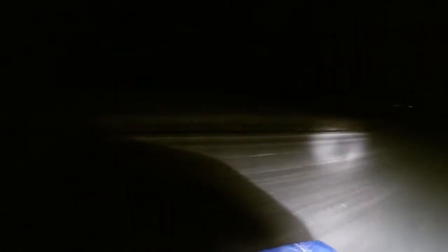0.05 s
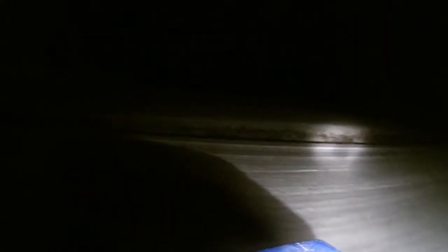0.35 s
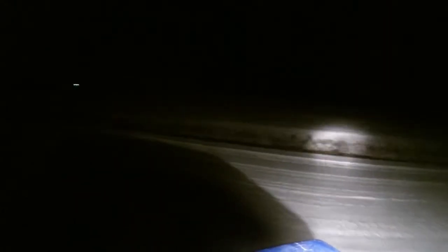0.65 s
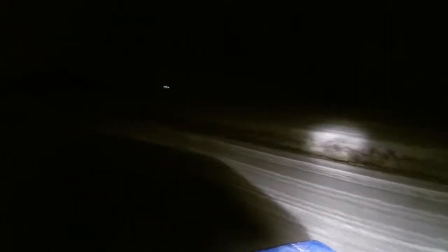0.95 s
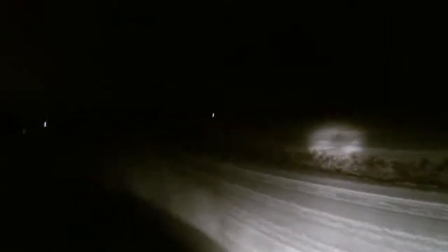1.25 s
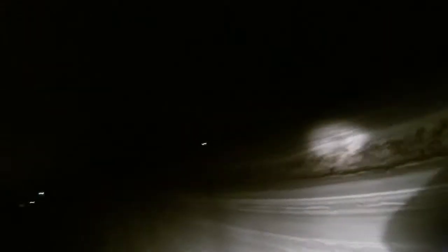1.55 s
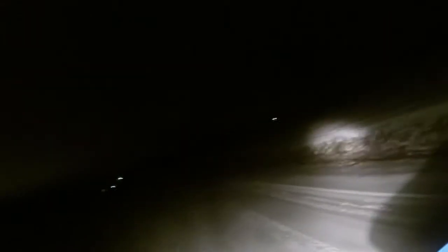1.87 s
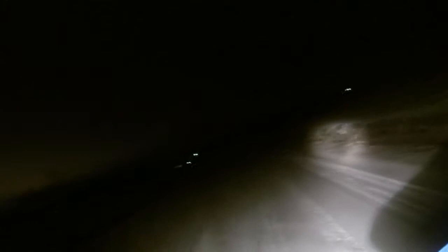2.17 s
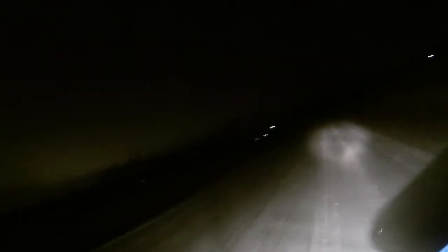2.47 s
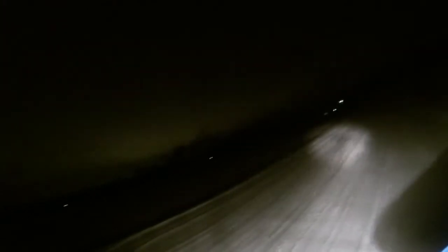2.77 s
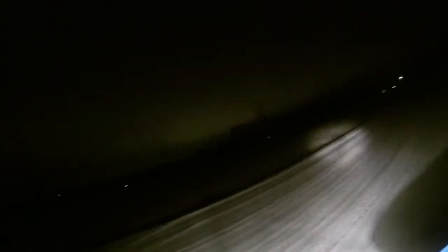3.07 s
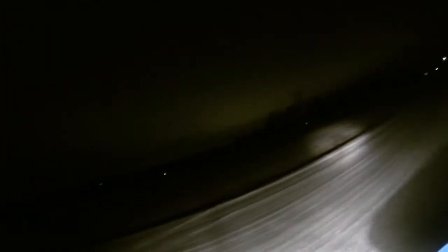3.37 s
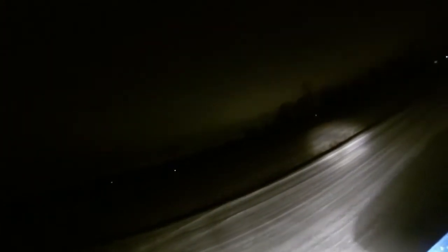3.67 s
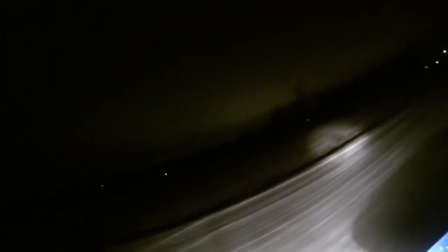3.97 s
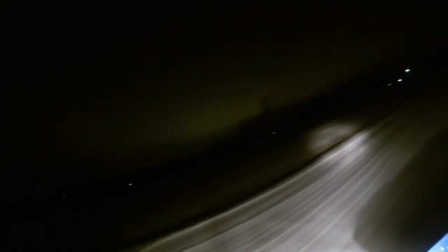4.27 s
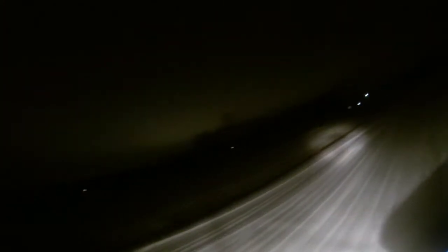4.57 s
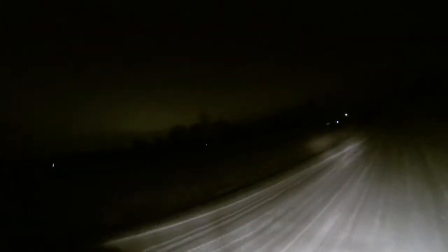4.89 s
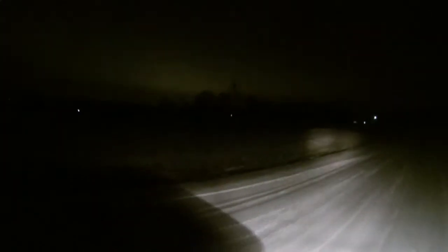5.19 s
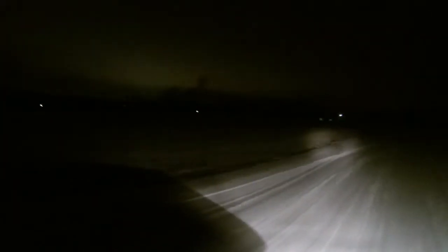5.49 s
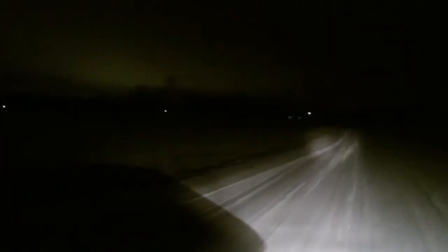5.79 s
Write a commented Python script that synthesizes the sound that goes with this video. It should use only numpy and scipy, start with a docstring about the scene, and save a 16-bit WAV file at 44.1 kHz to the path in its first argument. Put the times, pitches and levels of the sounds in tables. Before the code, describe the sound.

Close to the microphone, a two-stroke quad engine sputters at low speed outdoors. The rider blips the throttle about six times, each buzzing rise sinking back into a growl, the later ones coming closer together. The revs then stay fairly high, wavering with quick small pushes. A mechanical whirr and low shudder run underneath, and the bodywork clicks and rattles toward the end.

```python
"""On a dark track, a small two-stroke quad is heard from the rider's seat.
It putters unevenly, is blipped up and down six times, then held at high revs with short dabs of throttle.
Each turn of the crank fires once, so the sound is built on orders: multiples of the firing rate.
The firings excite fixed resonances: the exhaust booms, the cylinder rasps and the crankcase whirrs,
while the frame shudders and loose parts knock in time."""
import sys
import numpy as np
from scipy import signal
from scipy.fft import rfft, irfft
from scipy.io import wavfile

SR = 44100
rng = np.random.default_rng(int(sys.argv[2]) if len(sys.argv) > 2 else 0)


def transcribe(u):
    """Save the signal u as a 16-bit wav file named by the first command-line argument.

    u: samples, shape (n,) or (channels, n), limited to [-1, 1]; the rate is SR.
    q: integer samples, one column per channel.
    """
    v = np.clip(np.atleast_2d(u).T, -1, 1)
    q = np.round(v * 32767).astype(np.int16)
    wavfile.write(sys.argv[1], SR, q)


N = 266364
TIME = np.arange(N) / SR
MID_HZ = 104.2  # firing rate in the middle of the rev range

# At low revs the engine four-strokes: two turns in five fire hard.
# Each entry: the strength of one firing against the mean.
FIRING_PATTERN = [2.5, -0.27, 1.5, -1.7, -1]
# Slow drift of the mechanical noise. Each row: time in seconds, rasp in dB, whirr in dB.
MACHINE_DRIFT = [(0, 4, -15), (0.901, 3, -5), (1.08, -3.5, -9), (1.16, 4.5, 3), (1.27, -4.5, -6),
                 (1.42, 3, 2), (1.75, 3.5, 2.5), (1.9, 1, -4.5), (2.04, 4.5, 0.5), (2.16, -2, -1.5),
                 (2.24, 2, -1), (2.35, 0.5, 1), (2.65, 1, 2.5), (3.2, -1, 2), (3.88, -1.5, 0.5),
                 (4.0, 2, -3), (4.1, -1, -3), (4.3, 0, 0), (5.0, 2, 1), (5.32, -0.5, -6), (5.55, 6.5, 0.5),
                 (6.04, 2.5, 0.5)]
# A flare as the engine falls back from its highest revs.
# In order: time and half length in seconds, lift of the snarl and of the rasp in dB.
OVERRUN_FLARE = (1.41, 0.042, 13, 5.7)


def exhaust(turns, speed, throttle, silencer_db=-26, trim_db=-0.35, lag_s=0.0045):
    """Forced resonance: each low order swells a moment after it crosses a resonance of the pipe."""
    # Each row: firing rate in Hz, then the levels of orders 1 to 4 in dB.
    pipe_response = [(68, -23, -24.5, -37, -25), (77.2, -26.5, -26, -25, -23.5), (85, -28, -27.5, -21, -19),
                     (91.6, -18, -29.5, -25.5, -22.5), (97.3, -16.5, -29.5, -21.5, -28.5),
                     (104.1, -19.5, -27, -20.5, -26.5), (112, -21.5, -24, -23.5, -27),
                     (118.1, -25.5, -15, -29.5, -24.9), (129.3, -31, -13, -27.5, -25),
                     (140.3, -34.2, -23, -22, -24), (149, -35, -16, -23, -36)]
    # Each entry: the lift at full throttle in dB, for orders 1 to 4.
    throttle_lifts = [1.5, 3, -1, -2]
    # Each row: time in seconds, then the drift of orders 1 to 4 in dB.
    order_drift = [(0, -1.5, 5.5, 0, 0.82), (.9, -1.5, 5.5, -2, -2), (1.1, 1, 0, -1.2, -2.3),
                   (2.15, 0, 0.5, 0.21, 1.7), (4.5, 1.5, 0.5, 0.084, 0.22), (4.719, -6.5, -1, -1.02, 0),
                   (5.25, -3.5, 0, -1, -0.29), (5.6, 0.5, 0.5, 0.03, 0), (6.04, 0, 0, -0.45, 0)]
    # The silencer colours the upper orders. Each row: frequency in Hz, relative gain in dB.
    silencer = [(250, -30), (345, 12), (400, -11.5), (480, 6), (530, 1), (600, -10), (700, -31),
                (800, -35.5), (1500, -54.5)]
    airbox_hz, airbox_width_hz, airbox_db = 332, 36, 10.5  # honks when the throttle is open
    rates, *responses = np.transpose(pipe_response)
    lagged = np.interp(TIME - lag_s, TIME, speed)
    out = gain_of(silencer_db) * through(upper_orders(turns), silencer)
    per_order = zip(responses, throttle_lifts, follow(order_drift))
    for order, (response, lift_db, drift_db) in enumerate(per_order, 1):
        honk_db = airbox_db * bell(order * lagged, airbox_hz, airbox_width_hz)
        db = np.interp(lagged, rates, response) + (lift_db + honk_db) * throttle
        db += drift_db + 2 * wander(16) + trim_db
        out += np.sqrt(2) * gain_of(db) * np.cos(2 * np.pi * (order * turns + rng.random()))
    return out


def sputter(turns, speed, throttle, uneven_db=-4, pattern_db=-6.5, gas_db=-7):
    """Amplitude modulation: unequal firings put sidebands between the orders, and the pipe growls."""
    # Resonances of the pipe. Each row: frequency in Hz, relative gain in dB.
    pipe = [(60, -27), (110, -5.5), (150, -22), (195, -20), (245, -5), (325, -2.5), (400, -8), (490, -6.5),
            (600, -19), (790, -27.5), (1000, -31), (3000, -83)]
    # In order: base level in dB, dB per octave of revs, dB added at full throttle.
    law = (-25, -11, 3.5)
    db = level(law, speed, throttle, waver_db=0.1)
    slow = low_revs(speed, below_hz=90, span_hz=12)
    uneven = evened(firings(turns, rng.uniform(-0.76, 1, 1024))) * (1 - 0.07 * slow)
    pattern = evened(firings(turns, FIRING_PATTERN)) * slow
    gas = evened(puffs(turns, decay=0.2, floor=0.26))
    drive = gain_of(uneven_db) * uneven + gain_of(pattern_db) * pattern + gain_of(gas_db) * gas
    return gain_of(db) * through(reflected(drive, delays_s=(.0019, .0031, .0047)), pipe)


def snarl(turns, speed, throttle, gas_db=-7):
    """Source and filter: high orders and rushing gas take a bright edge from the tailpipe."""
    # Resonances of the tailpipe. Each row: frequency in Hz, relative gain in dB.
    tailpipe = [(480, -19), (620, 3), (700, 1.5), (780, -7.5), (850, 4.5), (930, -1.5), (1020, -6.5),
                (1160, -2), (1400, -4), (2200, -21), (4000, -49)]
    # In order: base level in dB, dB per octave of revs, dB added at full throttle.
    law = (-38, -1, 7.1)
    # Each row: time in seconds, drift of the level in dB.
    drift = [(0, -3), (.45, -1), (.7, 1), (1.15, -2.5), (1.8, 3), (2.4, -1.5), (2.75, 3), (3.25, 4),
             (3.75, 2.5), (4.15, 0), (4.45, 2.5), (4.7, -1.5), (5.35, 0), (6.04, -0.5)]
    flare_s, half_s, flare_db, _ = OVERRUN_FLARE
    db = level(law, speed, throttle, waver_db=1.34) + follow(drift)[0]
    db += flare_db * swell(flare_s, half_s)
    gas = through(puffs(turns, decay=0.088, floor=0.78), tailpipe)
    return gain_of(db) * (through(upper_orders(turns), tailpipe) + gain_of(gas_db) * gas)


def cylinder(turns, speed, throttle, gas_db=-1, slap_db=-6):
    """Broadband excitation: rushing gas and piston slap ring the cylinder, which rasps."""
    # Resonances of the cylinder. Each row: frequency in Hz, relative gain in dB.
    walls = [(500, -37.5), (1020, -17), (1300, 2), (1550, 2.5), (1800, -7.5), (2150, -15.5), (2440, -23),
             (2680, -17.5), (3300, -30.5), (3900, -28.5), (4500, -38.5), (5400, -33.5), (7000, -58.5),
             (15000, -64)]
    # In order: base level in dB, dB per octave of revs, dB added at full throttle.
    law = (-30, -1.4, 6.26)
    drift_db, _ = follow(MACHINE_DRIFT)
    flare_s, half_s, _, flare_db = OVERRUN_FLARE
    db = level(law, speed, throttle, waver_db=1.46) + drift_db + flare_db * swell(flare_s, half_s)
    gas = through(puffs(turns, decay=1, floor=1) * gain_of(1.3 * wander(42)), walls)
    impacts = firings(turns, 1 + 0.72 * rng.uniform(-1.3, 1, 1024))
    slap = through(reflected(impacts, delays_s=(.0007, .0013)), walls)
    return gain_of(db) * (gain_of(gas_db) * gas + gain_of(slap_db) * slap)


def crankcase(turns, speed, throttle, grind_db=-5, ring_db=-7, case_hz=1920, width_hz=150):
    """Friction and resonance: bearings grind, and each gear whine flares as it crosses the case's mode."""
    # Whirr of the case. Each row: frequency in Hz, relative gain in dB.
    whirr = [(1000, -16.5), (1600, -0.5), (1930, 5), (2120, -1), (2400, -13), (2750, -16.5), (3250, -26),
             (3650, -9.5), (3950, -10.5), (4250, -28), (5700, -27.5), (7300, -46), (8400, -49.5),
             (15000, -63)]
    # Each row: a gear whine's multiple of the crank speed, its relative level in dB.
    gears = [(14.9, -8), (21.8, -4)]
    # In order: base level in dB, dB per octave of revs, dB added at full throttle.
    law = (-29, -3, 0.73)
    _, drift_db = follow(MACHINE_DRIFT)
    db = level(law, speed, throttle, waver_db=0.44) + drift_db
    grind = through(puffs(turns, decay=1, floor=1), whirr)
    out = gain_of(grind_db) * grind + gain_of(ring_db) * castings(turns)
    for order, gear_db in gears:
        resonance = .28 + bell(order * speed, case_hz, width_hz)
        falloff = 1 / (1 + (order * speed / 2150) ** 18)
        whine = np.sqrt(2) * np.cos(2 * np.pi * order * turns + .5 * wander(70))
        out += gain_of(gear_db + 2 * wander(30)) * resonance * falloff * whine
    return gain_of(db) * out


def castings(turns):
    """Modal ringing: gas and piston excite the metal castings, whose narrowest modes last longest."""
    # Each row: frequency in Hz, bandwidth in Hz, relative level in dB.
    modes = [(1300, 31, 1), (1600, 29, 0), (1830, 32, -1), (2672, 60, -9.5), (3815, 99, -12)]
    t = np.arange(2048) / SR
    ring = sum(gain_of(db) * np.sqrt(width) * np.exp(-np.pi * width * t) * np.sin(2 * np.pi * hz * t)
               for hz, width, db in modes)
    gas = evened(puffs(turns, decay=0.21, floor=0.35))
    piston = evened(firings(turns, 1 + .5 * rng.uniform(-1, 1, 1024)))
    band = signal.butter(3, [1200, 4300], "band", fs=SR, output="sos")
    drive = signal.sosfilt(band, gas + 0.58 * piston)
    return evened(signal.oaconvolve(drive, ring)[:N])


def panel(speed, boost_db=21, rebound=0.66, rebound_s=0.001366, chatter_s=0.0014):
    """Impact excitation: a sharp contact, a softer rebound and a brief chatter ring a plastic panel."""
    # Resonances of the panel. Each row: frequency in Hz, relative gain in dB.
    plastic = [(300, -23), (900, -32), (1250, 0), (1500, 5), (1720, 0), (2200, -20.5), (2800, -16),
               (4200, -25.5), (5800, -34.5), (8000, -49.5), (15000, -62.5)]
    # Bouts of one knock a firing.
    # Each row: start and length in seconds, relative levels of the first and last knock in dB.
    bouts = [(1.194, .013, -12, -10.5), (4.428, .016, -18, -25.5), (4.753, .024, -28, -18),
             (4.992, .013, -10.5, -14.5), (5.134, .004, -16.5, -15), (5.17, .013, -14.5, -13),
             (5.36, .004, -17.5, -17), (5.378, .004, -15.5, -15), (5.464, .004, -17.5, -17),
             (5.491, .022, -12.5, -13), (5.528, .013, -11, -15), (5.556, .004, -11, -12),
             (5.574, .012, -10, -14), (5.623, .004, -17, -18), (5.66, .04, -16.5, -18),
             (5.744, .031, -10.5, -16.5), (5.832, .004, -14, -14), (5.897, .004, -7.5, -8),
             (5.905, .022, -14.5, -13), (5.955, .004, -18.5, -17), (6.008, .013, -18, -16)]
    out, t = np.zeros(N), np.arange(600) / SR
    ring = impulse_response(plastic)
    for start, length, first_db, last_db in bouts:
        period_s = 1 / np.interp(start, TIME, speed)
        times = start + np.arange(0, length, period_s)
        for s, db in zip(times, np.linspace(first_db, last_db, len(times))):
            chatter = .04 * rng.standard_normal(len(t)) * np.exp(-t / chatter_s)
            soft = np.exp(-((t - rebound_s * rng.uniform(0.92, 0.96)) / .0001) ** 2)
            force = (t == 0) + rebound * soft / soft.sum() + chatter
            knock = np.convolve(force, ring)
            add(out, s, gain_of(db + boost_db) * knock / np.linalg.norm(knock))
    return out


def frame(speed, throttle):
    """Random vibration: the frame shudders around its low resonance; rubber mounts bound the swing."""
    # Each row: frequency in Hz, relative gain in dB.
    resonance = [(12, -34), (24, -15.5), (33, -9.5), (42, 1), (50, 0.5), (60, -12), (90, -33), (300, -82.5)]
    # In order: base level in dB, dB per octave of revs, dB added at full throttle.
    law = (-34.5, -16, 1.7)
    # Swells of the low shudder while the engine runs slowly.
    # Each row: time and half length in seconds, lift in dB.
    shudder_swells = [(0.659, .1, 4), (1.896, .09, 7.5), (2.042, .04, 7), (3.74, .05, 5)]
    db = level(law, speed, throttle, waver_db=2)
    db += sum(lift_db * swell(s, half_s) for s, half_s, lift_db in shudder_swells)
    sway = signal.hilbert(through(rng.standard_normal(N), resonance, size=32768))
    bounded = sway.real / np.sqrt(abs(sway) ** 2 + 3)
    return gain_of(db) * evened(bounded)


def fittings(turns):
    """Forced rattling: small loose parts tick once a turn while the engine shakes them free."""
    # Each row: frequency in Hz, relative gain in dB.
    resonances = [(1000, -19), (2200, -11.5), (2700, 12), (3200, -7), (3850, 8), (4300, -11), (4900, 2.5),
                  (5400, -19), (7500, -37), (11500, -38), (15000, -35)]
    # Spells of buzzing. Each row: start and end in seconds, level in dB.
    spells = [(.96, 1.035, -40), (1.221, 1.23, -37), (1.585, 1.651, -35), (1.695, 1.734, -36),
              (1.789, 1.872, -40), (2.175, 2.275, -38), (2.614, 2.672, -41), (2.77, 2.81, -46),
              (3.914, 4.057, -46), (4.74, 4.81, -42), (5.594, 5.65, -35)]
    shake = np.zeros(N)
    for start, end, db in spells:
        add(shake, start, gain_of(db) * signal.windows.tukey(int((end - start) * SR), .4))
    return shake * through(puffs(turns, decay=0.23, floor=0.046), resonances)


def slack_drive(turns, speed, level_db=-46):
    """Backlash: while the engine four-strokes, the drive clatters once in each round of the pattern."""
    # Each row: frequency in Hz, relative gain in dB.
    clatter = [(1200, -12), (2100, 14.5), (2440, -5), (2700, 8), (3300, -15), (4100, -7.5), (4500, -21),
               (5500, -9.5), (7200, -27), (8500, -27), (15000, -39.5)]
    slow = low_revs(speed, below_hz=81, span_hz=4)
    burst = np.exp(-(turns / len(FIRING_PATTERN) % 1) / .25)
    return gain_of(level_db) * slow * through(burst * puffs(turns, decay=0.33, floor=0.33), clatter)


def squeaks():
    """Band-limited noise: brief high bursts squeak when the band is narrow and sizzle when it is wide."""
    # Each row: start and length in seconds, centre and width in Hz, level in dB.
    bursts = [(0.959, 0.067, 12100, 1130, -63), (0.967, .06, 9500, 250, -67),
              (1.224, 0.0057, 5470, 3170, -48), (1.34, 0.12, 7600, 398, -63),
              (5.606, 0.0087, 5100, 130, -38), (5.614, 0.0091, 5000, 130.3, -36)]
    out, hz = np.zeros(N), np.fft.rfftfreq(SR, 1 / SR)
    for start, length, centre, width, db in bursts:
        band = evened(irfft(rfft(rng.standard_normal(SR)) * bell(hz, centre, width)))
        window = signal.windows.tukey(int(length * SR), .5)
        add(out, start, gain_of(db) * window * band[:len(window)])
    return out


def tyres_and_chain(turns, speed, base_db=-71, db_per_octave=5):
    """Modulated noise: the faint hiss of tyres and chain pulses each turn and grows with the revs."""
    # Each row: frequency in Hz, relative gain in dB.
    hiss = [(2000, -3), (6300, -2.5), (7400, -2.5), (8400, 5.5), (9900, -12.5), (11500, 2.5), (12200, -13),
            (12900, -5), (13800, -10.5), (15000, -22.5)]
    db = base_db + db_per_octave * np.log2(speed / MID_HZ) + 1.8 * wander(12)
    return gain_of(db) * through(puffs(turns, decay=.2, floor=.5), hiss)


def riding(end_hz=107.7, easing=.27, peak_skew=0.82, opening_power=0.68):
    """Inertia: each blip pulls the revs up, then they coast down. Gives firing rate in Hz and throttle."""
    # Puttering before the first blip. Each row: time in seconds, firing rate in Hz, throttle from 0 to 1.
    cruise = [(0, 71.4, 0.4), (.17, 69, 0.34), (.33, 77, .4), (.7, 77, 0.47), (.9, 77.5, 0.5),
              (1.04, 81.5, 0.4)]
    # Each row: opening time in seconds, firing rate then in Hz, shutting time in seconds, rate then
    # in Hz, exponents of the rise and of the fall (1 is even), peak throttle from 0 to 1.
    blips = [(1.068, 81.88, 1.312, 151.3, 1.16, 1.01, 0.8), (2.036, 68.67, 2.3, 123.8, 1.5, 1.17, 0.8),
             (2.578, 88.53, 2.771, 135.9, 1.6, 1.11, 1), (3.193, 83.96, 3.376, 128.9, 1.28, 1.08, 1),
             (3.771, 78.33, 4.076, 131.1, 2.06, 1.13, 0.93), (4.382, 90.98, 4.534, 130.7, 1.21, 1.07, 1),
             (4.731, 101.1, 4.849, 124.9, 1.13, 1.13, 1), (4.961, 108.4, 5.043, 125.9, 0.79, 1.02, 0.71),
             (5.131, 113.5, 5.235, 127.2, 1.65, 1.04, 0.48), (5.35, 112.7, 5.417, 121, 1.03, 0.96, 0.25),
             (5.532, 107.2, 5.595, 119.5, 1.14, 1.07, 0.49), (5.694, 105.6, 5.772, 118.1, 1.18, 1.09, 0.37),
             (5.859, 107.7, 5.925, 119.9, 1.21, 1.62, 0.32)]
    speed, throttle = follow(cruise)
    ends = [row[:2] for row in blips[1:]] + [(TIME[-1], end_hz)]
    for (opens, low, shuts, top, lag, linger, push), (reopens, rest) in zip(blips, ends):
        rise = np.clip((TIME - opens) / (shuts - opens), 0, 1) ** lag
        fall = np.clip((TIME - shuts) / (reopens - shuts), 0, 1) ** linger
        climb = rise - easing * np.sin(2 * np.pi * rise) / (2 * np.pi)
        opening = abs(np.sin(np.pi * rise ** peak_skew)) ** opening_power
        speed = np.where(TIME > opens, (low + (top - low) * climb) * (rest / top) ** fall, speed)
        throttle = np.where(TIME > opens, push * opening, throttle)
    return speed, throttle


def crank(speed, lurch_turns=.009):
    """Phase is the integral of speed; while the engine four-strokes, hard firings jerk the crank ahead."""
    turns = np.cumsum(speed) / SR
    slow = low_revs(speed, below_hz=86.5, span_hz=4)
    return turns + lurch_turns * slow * np.sin(2 * np.pi * turns / len(FIRING_PATTERN))


def jolts(turns, speed, pattern_db=-1.5, shake_db=2.5):
    """Amplitude modulation: a gain that pulses with the pattern at low revs and shakes with the ride."""
    slow = low_revs(speed, below_hz=84, span_hz=6)
    pulsing = np.cos(2 * np.pi * turns / len(FIRING_PATTERN))
    return gain_of(pattern_db * slow * pulsing + shake_db * wander(18))


def firings(turns, strengths):
    """An impulse train: one band-limited pulse per turn, taking the strengths in rotation."""
    at = np.interp(np.arange(1, int(turns[-1])), turns, np.arange(N))
    near = at.astype(int)[:, None] + np.arange(-7, 9)
    offset = near - at[:, None]
    pulses = np.sinc(offset) * np.sinc(offset / 9) * np.resize(strengths, len(at))[:, None]
    return np.bincount(np.clip(near, 0, N - 1).ravel(), pulses.ravel(), N)


def puffs(turns, decay, floor):
    """Pulsed noise: it flares above a floor at each firing, with a decay constant given in turns."""
    return rng.standard_normal(N) * (floor + np.exp(-(turns % 1) / decay))


def upper_orders(turns, lowest=5, count=19, size=4096):
    """A harmonic series: equally strong orders in random phase make one turn's shape, repeated."""
    lines = np.zeros(size // 2 + 1, complex)
    lines[lowest:lowest + count] = np.exp(2j * np.pi * rng.random(count))
    return np.interp(turns % 1, np.arange(size) / size, evened(irfft(lines)))


def reflected(x, delays_s, bounce=0.5):
    """All-pass echoes: reflections smear each pulse without colouring it."""
    spectrum, hz = rfft(x), np.fft.rfftfreq(N, 1 / SR)
    for delay in delays_s:
        echo = np.exp(-2j * np.pi * hz * delay)
        spectrum = spectrum * (echo - bounce) / (1 - bounce * echo)
    return irfft(spectrum, N)


def impulse_response(colour, size=4096):
    """Minimum phase: the causal ring, of unit energy, of a body with this frequency response."""
    points_hz, db = np.transpose(colour)
    hz = abs(np.fft.fftfreq(size, 1 / SR))
    log_gain = np.log(gain_of(np.interp(np.log(hz + 1), np.log(points_hz), db)))
    spectrum = np.exp(np.conj(signal.hilbert(log_gain)))
    ring = np.fft.ifft(spectrum).real[:size // 2]
    return ring / np.linalg.norm(ring)


def through(x, colour, size=4096):
    """Convolution plays x through a body; the result has an rms of one."""
    return evened(signal.oaconvolve(x, impulse_response(colour, size))[:N])


def level(law, speed, throttle, waver_db):
    """A power law of speed: the level in dB of a part, lifted by the throttle and wavering a little."""
    base_db, db_per_octave, throttle_db = law
    steady_db = base_db + db_per_octave * np.log2(speed / MID_HZ) + throttle_db * throttle
    return steady_db + waver_db * wander(13)


def low_revs(speed, below_hz, span_hz):
    """A linear fade from zero to one as the firing rate sinks below a threshold."""
    return np.clip((below_hz - speed) / span_hz, 0, 1)


def wander(hz, count=4096):
    """Low-pass noise with an rms of one, changing up to about hz times a second."""
    rates = np.fft.rfftfreq(count, TIME[-1] / count)
    coarse = evened(irfft(rfft(rng.standard_normal(count)) * np.exp(-(rates / hz) ** 2)))
    return np.interp(TIME, np.linspace(0, TIME[-1], count), coarse)


def bell(hz, centre_hz, width_hz):
    """A Gaussian peak of height one in frequency."""
    return np.exp(-((hz - centre_hz) / width_hz) ** 2 / 2)


def swell(s, half_s):
    """A Gaussian hump of height one in time."""
    return np.exp(-((TIME - s) / half_s) ** 2)


def follow(rows):
    """Linear interpolation of each column of a timed curve to every sample."""
    times, *columns = np.transpose(rows)
    return [np.interp(TIME, times, column) for column in columns]


def add(mix, s, sound):
    """Superposition: a sound joins the mix at s seconds."""
    part = mix[max(round(s * SR), 0):][:len(sound)]
    part += sound[:len(part)]


def gain_of(db):
    """Decibels to amplitude."""
    return 10 ** (np.asarray(db) / 20)


def evened(x):
    """Normalisation to an rms of one."""
    return x / np.sqrt(np.mean(x ** 2) + 1e-20)


def scene():
    """A common drive: one slightly wavering crank keeps the parts of the machine in step."""
    revs, throttle = riding()
    speed = revs * (1 + 0.003097 * wander(25.36))
    turns = crank(speed)
    engine = turns, speed, throttle
    pipe = exhaust(*engine) + sputter(*engine) + snarl(*engine)
    running_gear = crankcase(*engine) + tyres_and_chain(turns, speed)
    machinery = cylinder(*engine) + jolts(turns, speed) * running_gear
    rattles = panel(speed) + frame(speed, throttle) + fittings(turns) + slack_drive(turns, speed)
    return (pipe + machinery + rattles + squeaks())[None]


def record(dry, low_hz=20, high_hz=14600, ceiling=0.96):
    """Band limiting and saturation: a small microphone loses both extremes and rounds the peaks."""
    thin = signal.sosfilt(signal.butter(2, low_hz, "high", fs=SR, output="sos"), dry)
    rounded = thin / (1 + (thin / ceiling) ** 8) ** (1 / 8)
    low_pass = signal.firwin(511, high_hz, window=("kaiser", 9), fs=SR)
    return signal.oaconvolve(rounded, low_pass[None], "same")


dry = scene()
out = record(dry)
transcribe(out)
```